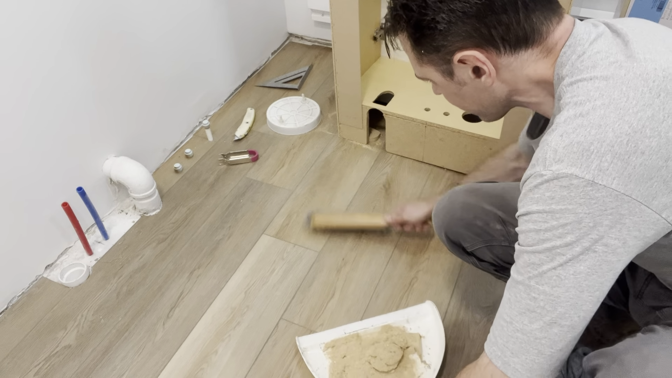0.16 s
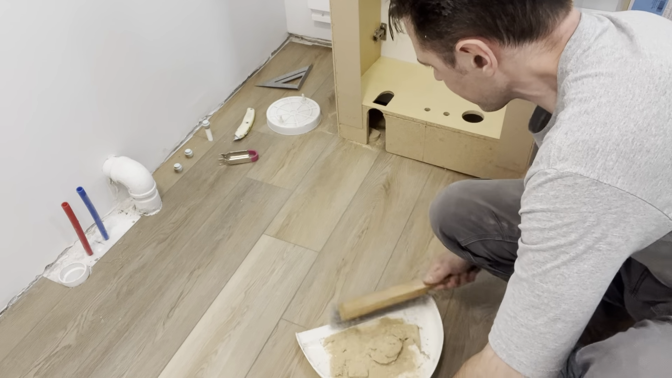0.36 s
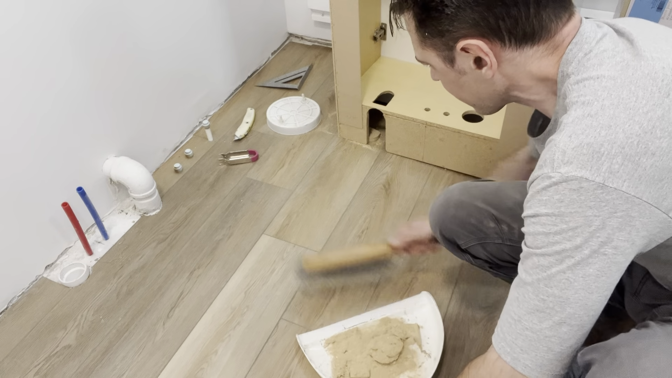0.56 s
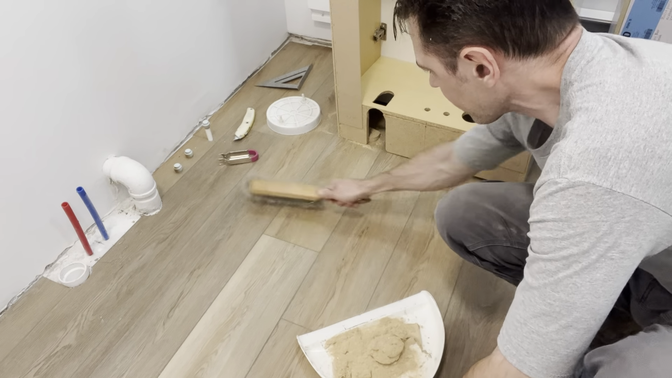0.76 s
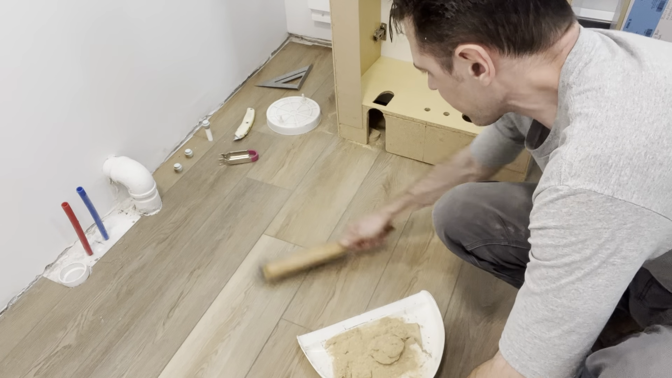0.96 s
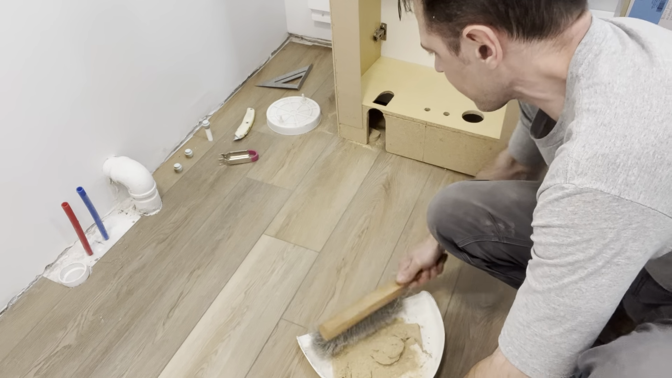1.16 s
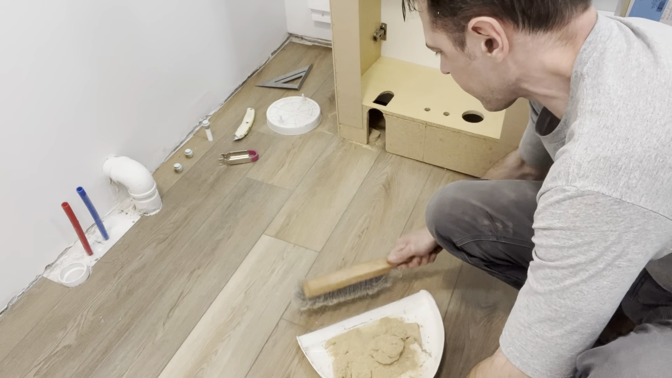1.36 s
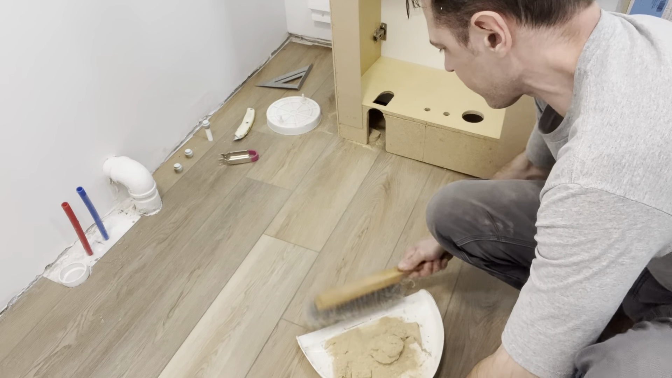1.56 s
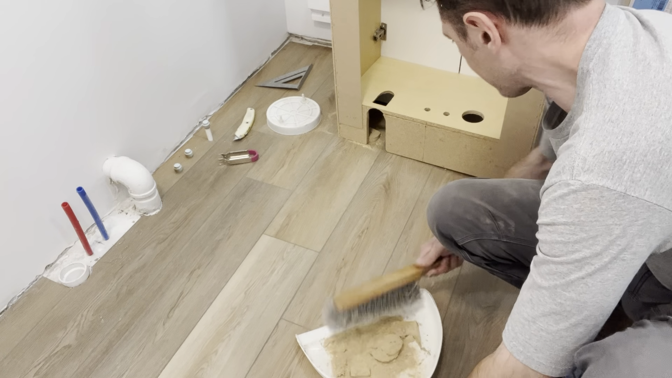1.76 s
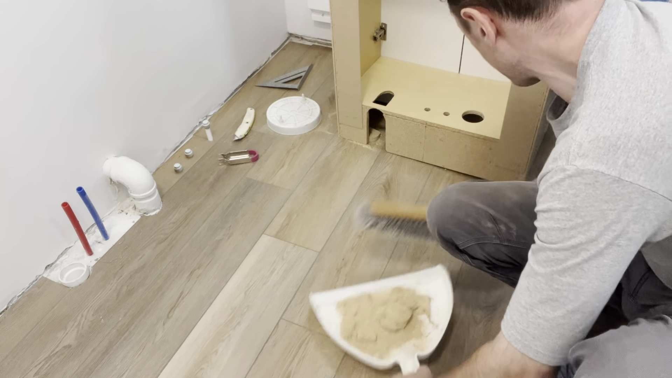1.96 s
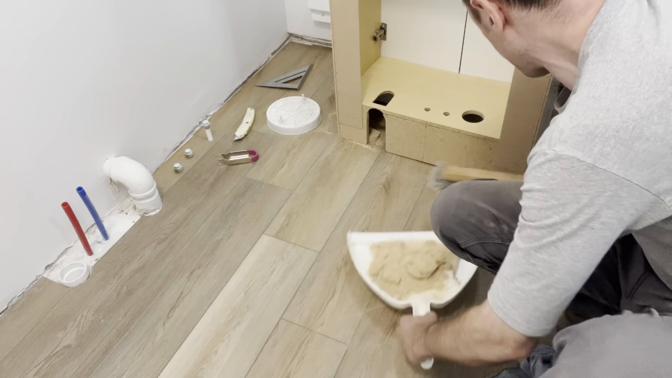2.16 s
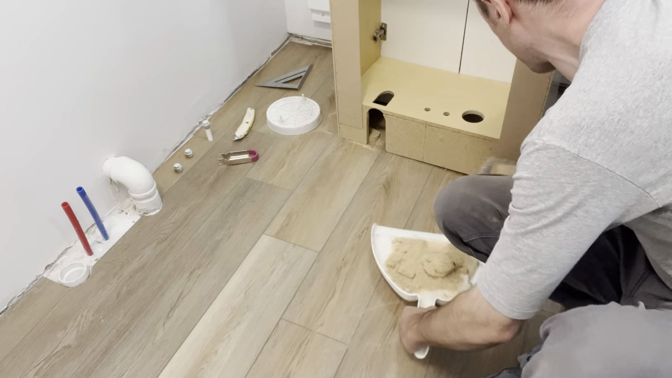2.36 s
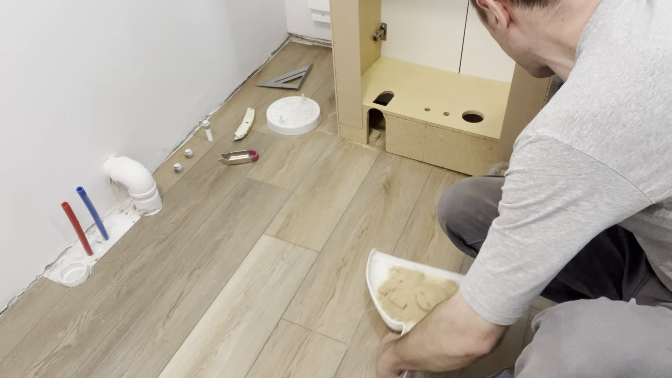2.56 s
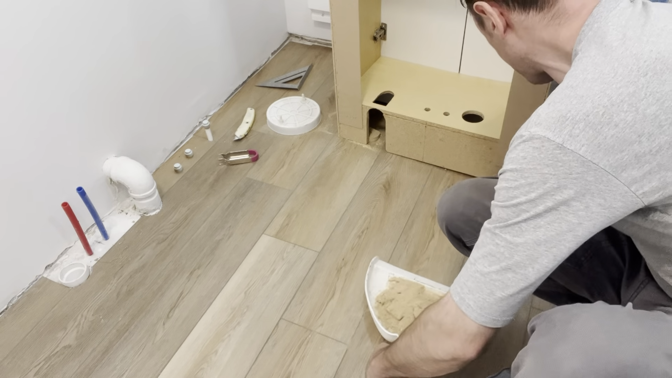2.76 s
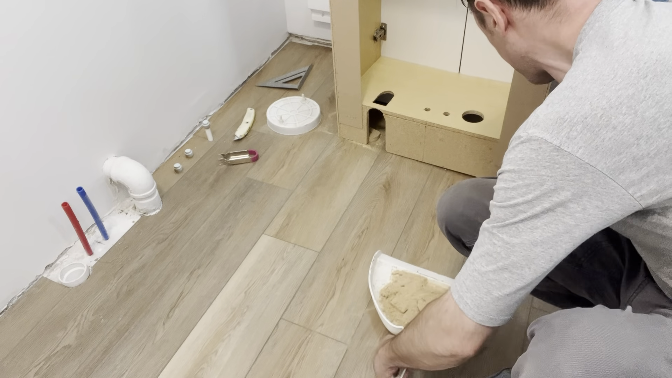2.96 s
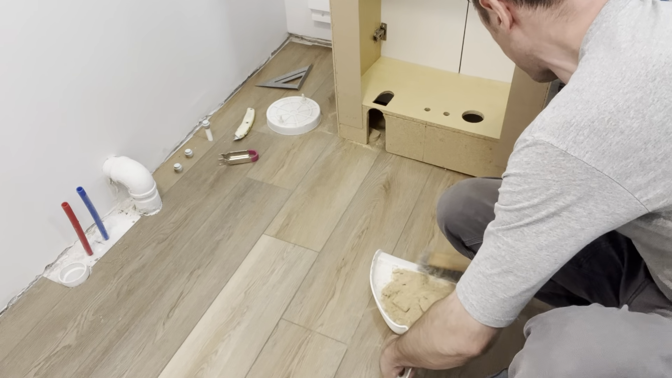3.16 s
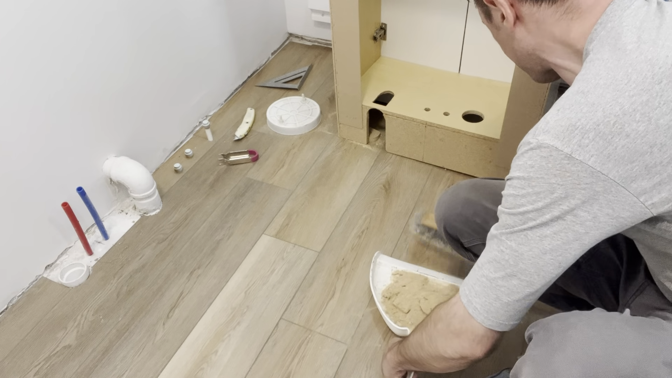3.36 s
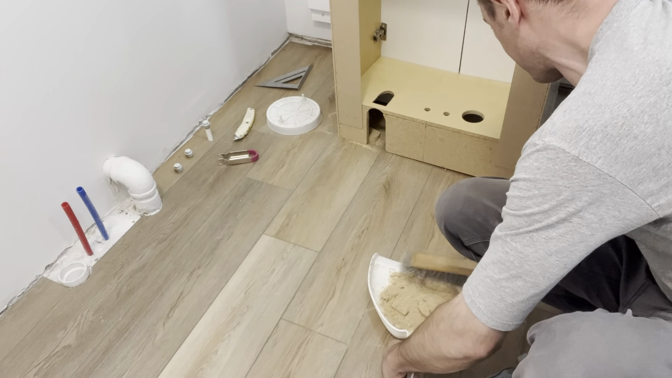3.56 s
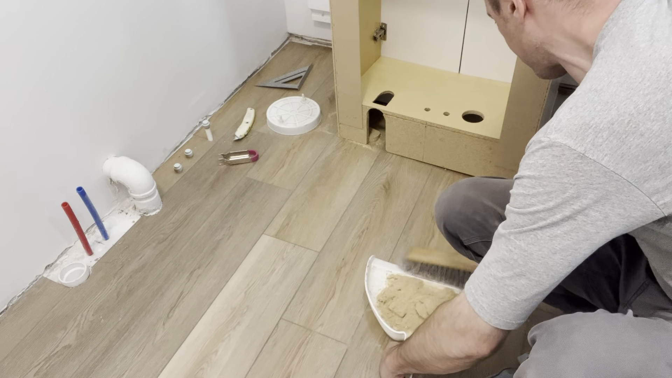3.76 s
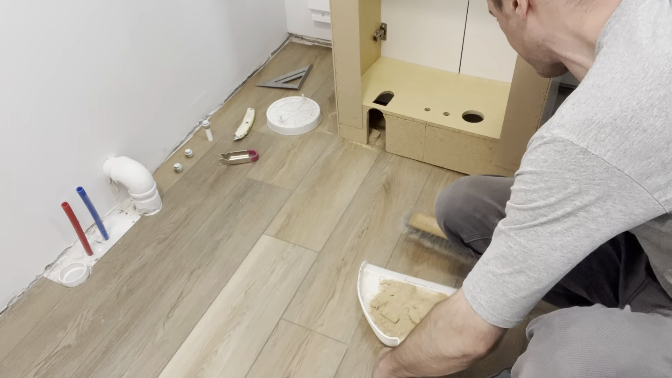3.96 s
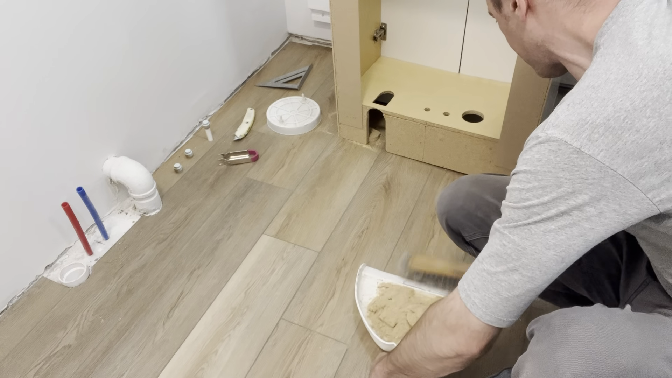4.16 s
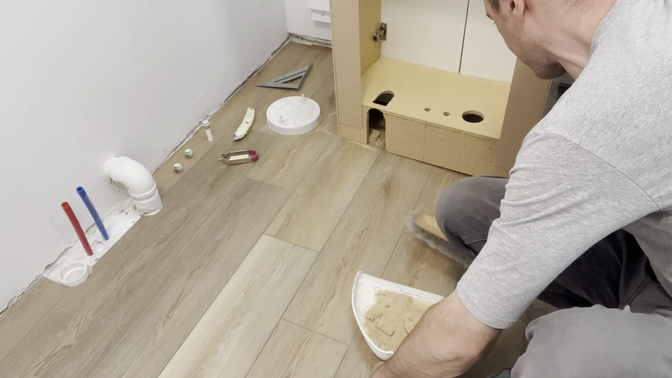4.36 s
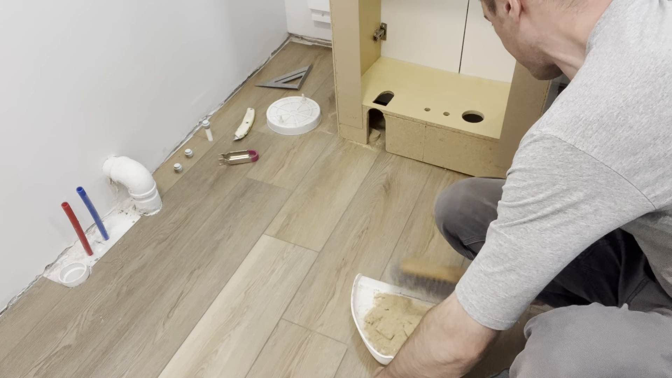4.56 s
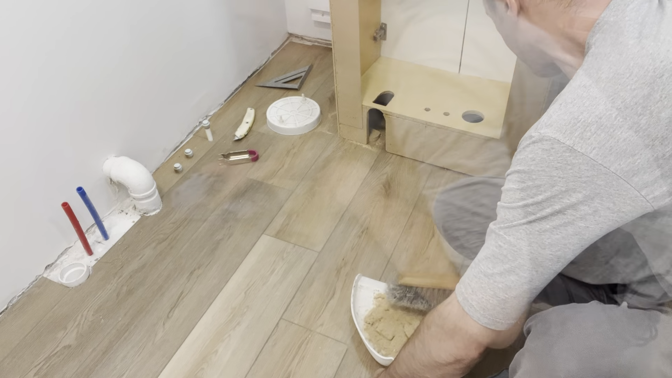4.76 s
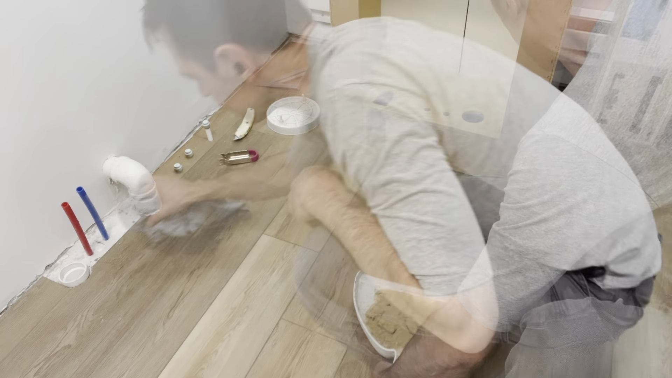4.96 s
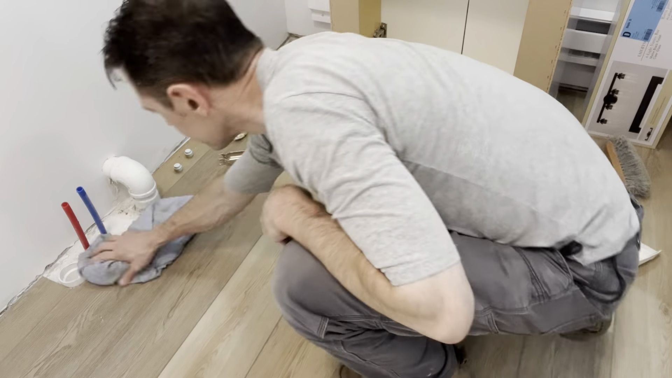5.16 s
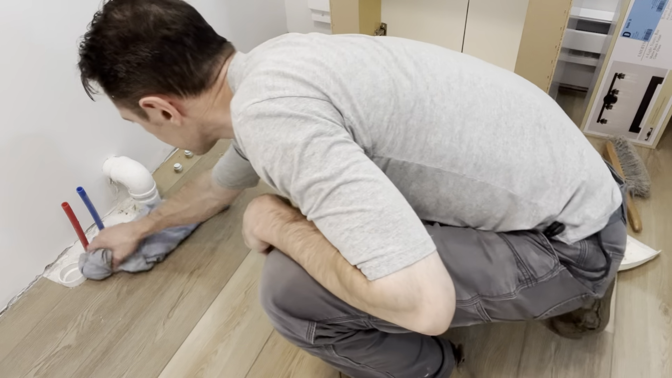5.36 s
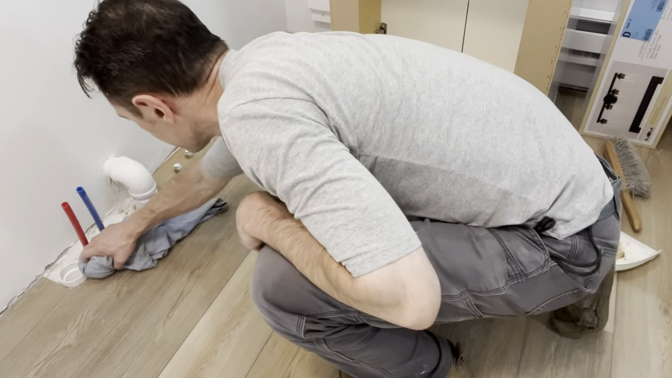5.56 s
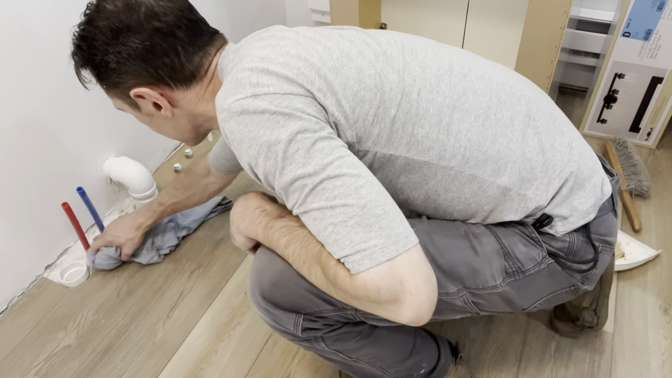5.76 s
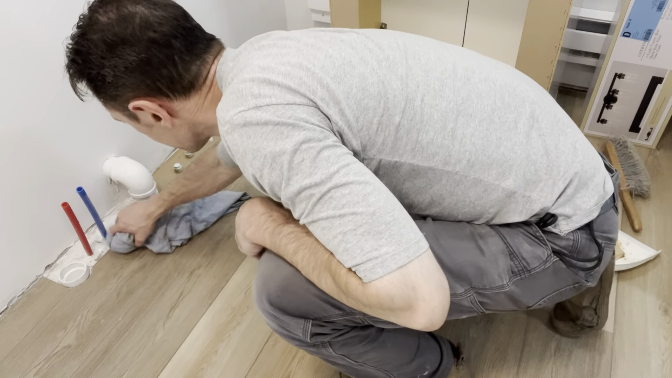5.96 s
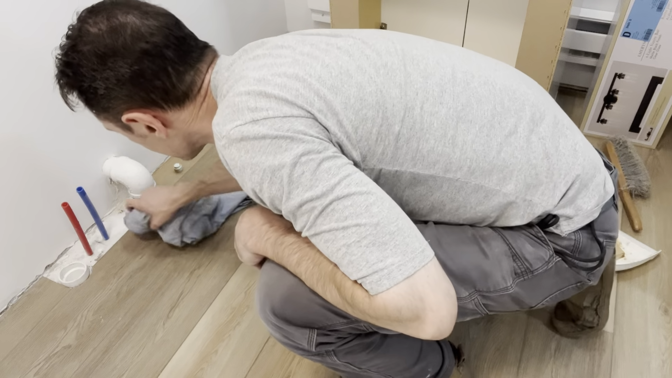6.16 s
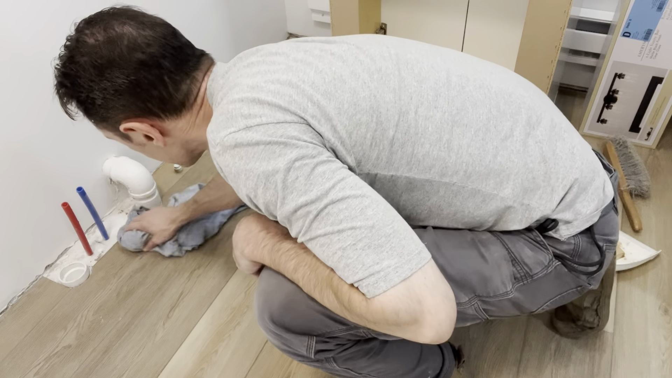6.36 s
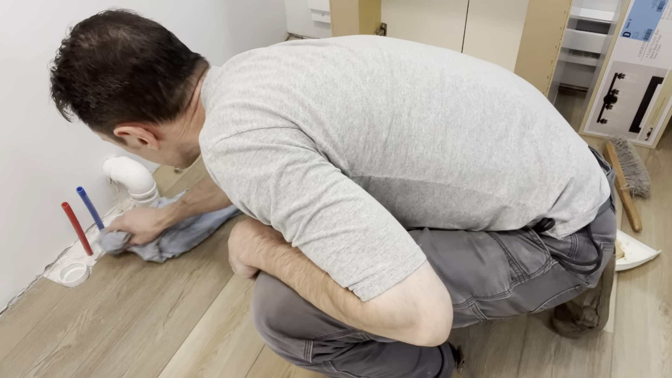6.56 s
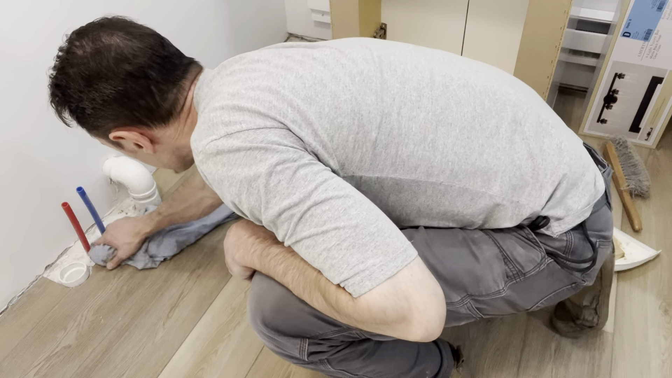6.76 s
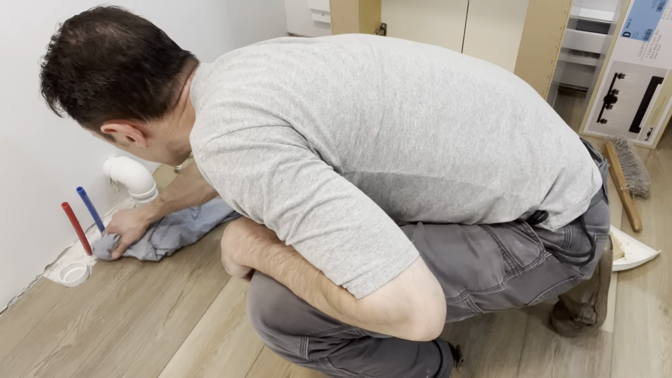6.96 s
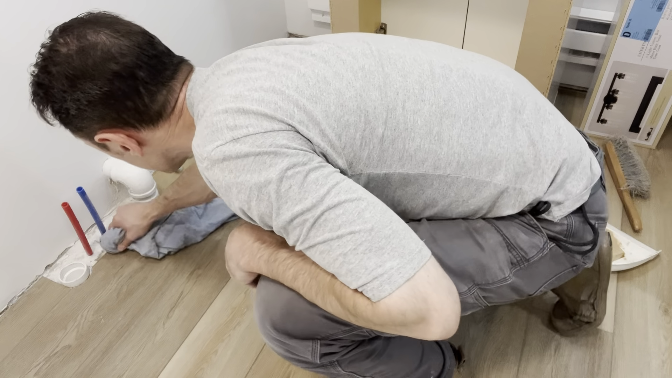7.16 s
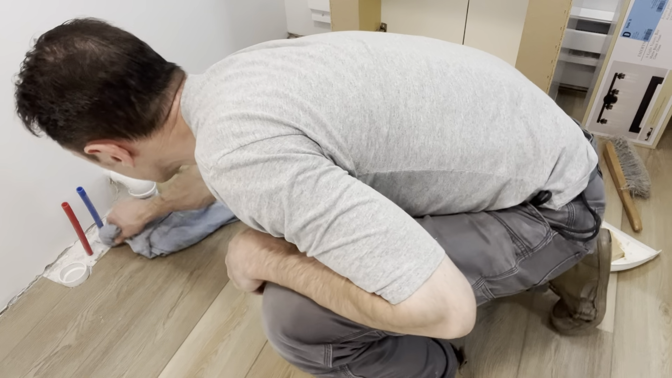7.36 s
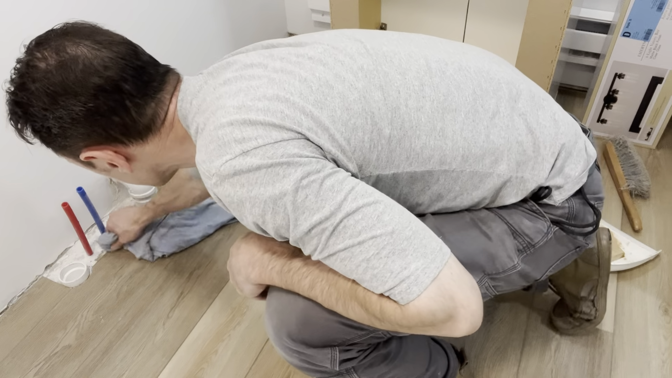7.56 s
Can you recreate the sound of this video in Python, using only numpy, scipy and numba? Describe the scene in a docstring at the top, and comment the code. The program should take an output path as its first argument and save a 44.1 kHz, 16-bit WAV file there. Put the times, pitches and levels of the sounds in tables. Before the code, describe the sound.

In a small bare room, a stiff hand brush sweeps sawdust over laminate in dry, swelling scrapes, then flicks and taps at a plastic dustpan. Knocks follow, the hardest just before four seconds with a low floor thump. Short brisk strokes continue until about five seconds, then a rag rubs faintly around a drain pipe with small hollow slips. Close stereo pickup, faint room tone, slightly more hiss on the left.

```python
"""A hand brush sweeps sawdust over a laminate floor into a plastic dustpan; floor thumps and harder knocks join in.
Then a rag wipes round a drain pipe, over the quiet of the house throughout.
Bristles and fibres are coloured random clicks; grit and blows ring the modes of pan and brush back.
Pushes on the floor and slips of the rag ring the modes of floor and pipe.
The room is small and bare; the left channel is hissier and the treble is nearly mono."""
import sys
import numpy as np
from scipy import signal
from scipy.fft import rfft, irfft, next_fast_len
from scipy.io import wavfile
from scipy.ndimage import uniform_filter1d
from numba import njit

SR = 44100
rng = np.random.default_rng(int(sys.argv[2]) if len(sys.argv) > 2 else 0)


def persist_wave(psi):
    """Save psi, clipped to +-1, as 16-bit WAV."""
    counts = np.round(np.clip(psi, -1, 1) * 32767).astype(np.int16)
    wavfile.write(sys.argv[1], SR, np.atleast_2d(counts).T)


N = 339570  # samples

# Event levels are ahead of the room; spectra are relative, as each layer is scaled to rms 1.
# Brush strokes: land_s, land_hiss_db, lift_s, lift_hiss_db, tips_db (above hiss, at FIRM_DB),
# rumble_db (above hiss), land_ring_db, lift_ring_db (above hiss), land_ring_hz, lift_ring_hz
STROKES = [(-0.02, -50.5, 0.36, -46, -5, -18.5, 0.5, 2, 1320, 1100),
           (0.79, -55, 1.01, -47, -1, -26, -10, -14, 1200, 1180),
           (1.02, -56, 1.13, -48, -2.5, -25, -18, -18, 1100, 1400),
           (1.31, -68, 1.34, -63, -9, -21, 1, 4, 1300, 1200),
           (1.412, -54, 1.457, -51, -3.5, -17, -7, -4.5, 1310, 1390),
           (1.62, -62, 1.655, -53.5, -2.5, -19, 6, -1, 1480, 1420),
           (1.745, -59, 1.763, -59.5, -5, -13.5, 0, 6, 1198, 1060),
           (2.637, -56, 2.93, -52, -3.5, -12.5, 9, 9.5, 985, 1140),
           (2.98, -52, 3.175, -48.5, -6, -30.5, 7, -5, 1190, 1160),
           (3.3, -67, 3.45, -60.5, -2, -22, 6, 0.5, 1250, 1300),
           (3.474, -54, 3.54, -50, -3.5, -20, -4.5, -4.5, 1270, 1330),
           (3.65, -69, 3.76, -54, -6, -28, 2, 5, 1201, 1260),
           (3.746, -43, 3.753, -45.5, -8, -8.5, 1, 5.5, 1350, 1300),
           (3.8, -54, 3.9, -51, -5.5, -18, 6.5, 3, 1260, 1120),
           (3.93, -53.5, 4.02, -52, -3.5, -30, 2.5, 3.5, 1250, 1360),
           (4.04, -62, 4.1, -56, 0, -32, 5, 2, 1300, 1230),
           (4.12, -56, 4.18, -50, -1, -33, -8, -6, 1300, 1460),
           (4.2, -51.5, 4.375, -49.5, -4, -27, -1, -1, 1320, 1140),
           (4.43, -51.5, 4.497, -47.5, -3.5, -13, -8, -6.5, 960, 1350),
           (4.679, -64, 4.715, -47.5, -4, -15, 3, 0, 1400, 1290),
           (4.86, -72, 4.905, -66.5, -4, -9, 10, 16, 1350, 1100),
           (4.92, -76, 5, -70, -1, -4, 9, 7, 1039, 900)]
# Rag wipes: land_s, land_hiss_db, lift_s, lift_hiss_db, drag_db (above hiss)
WIPES = [(5.09, -71, 5.17, -65.5, 1), (5.25, -79, 5.42, -69, -0.5), (5.55, -82, 5.64, -78.5, 4),
         (5.66, -74, 5.8, -54, -5.5), (5.8, -62, 5.91, -55.5, -3), (6.25, -70, 6.28, -67, 4),
         (6.38, -78, 6.5, -74, -2), (6.59, -74, 6.7, -64, -6), (6.86, -77.5, 7.08, -61.5, -4.5),
         (7.14, -68.5, 7.3, -65, -1.5), (7.33, -74, 7.44, -67, 2), (7.54, -69.5, 7.61, -60.5, -1)]
# Hard blows: start_s, level_db, struck_hz, crack_db, thud_db (both relative to level_db)
KNOCKS = [(1.41, -48.5, 1490, -6, -21), (1.628, -33.5, 1484, -4.5, -38), (1.641, -40.5, 1230, -7, -29),
          (1.667, -44, 1240, -3, -28), (1.699, -46.5, 1420, -2, -28), (2.64, -37, 850, -16, -22),
          (2.677, -30.5, 1145, -30, -35), (2.721, -43, 1080, -22, -26), (2.745, -42, 1150, -23, -25),
          (3.473, -45, 1400, -10, -20), (3.744, -20, 1300, -17, -27), (3.764, -35, 1300, -8, -19),
          (3.814, -34.5, 1670, -7, -23.5), (4.014, -35.5, 1340, -16, -43), (4.158, -39, 1790, -8.5, -28),
          (4.415, -34.5, 670, -18, -17), (4.431, -40, 670, -10, -18), (4.469, -37.5, 1220, -3, -24),
          (4.69, -32, 713, -11.5, -24), (4.691, -33.5, 1490, -14, -37), (4.705, -37, 690, -18, -29),
          (4.708, -40, 1570, -18, -35), (4.873, -46, 1040, -19, -26), (5.104, -49.5, 426, -24, -9),
          (5.604, -51.5, 331, -13, -9.5), (6.264, -58, 700, -17, -11), (7.414, -48, 1250, -12, -25),
          (7.418, -43, 480, -18, -10), (7.454, -46, 400, -22, -15)]
# Weight landing on the floor: time_s, drive_db (ahead of the floor response), slap_db (above drive_db)
THUMPS = [(0.02, -69.5, 13), (0.503, -71, -17.5), (0.809, -65, -14), (1.436, -65, -5), (1.642, -69, -4),
          (2.659, -66, -8), (3.487, -73, 1), (3.766, -42.5, -25), (4.159, -69, -8), (4.436, -51.5, -11),
          (4.711, -46.5, -8), (5.097, -65, 1), (5.169, -69.5, 11), (5.599, -65, 7), (6.031, -68, 0),
          (6.27, -66, -2), (6.478, -70, -3), (6.843, -68, -7), (7.099, -67, -4), (7.356, -69, -4),
          (7.419, -66, 8)]
# Hum of the pipe under the rag: time_s, level_db
PIPE_HUM = [(5.05, -80), (5.13, -66.5), (5.2, -74.5), (5.8, -74), (6.2, -75.5), (6.27, -65.5), (6.4, -76.5),
            (6.8, -71.5), (6.95, -63), (7.06, -60.5), (7.4, -60.5), (7.53, -64), (7.7, -61)]

# Floor resonances: mode_hz, gain_db, t60_s
FLOOR_MODES = [(57, -13, 0.35), (70, 3, 0.2)]
# Slapped floor boards: mode_hz, gain_db, t60_s
BOARD_MODES = [(138, -1, 0.16), (213, 1, 0.11)]
# Pan and brush back, ringing freely: mode_hz, gain_db, t60_s
BODY_MODES = [(363, -7.5, 0.052), (498, -7.5, 0.11), (579, -21, 0.22), (689, -5, 0.11), (800, -4.5, 0.11),
              (840, -4.5, 0.087), (945.5, -1, 0.051), (1080, -1, 0.044), (1206, 2, 0.033),
              (1292, -0.5, 0.054), (1380, 4, 0.025), (1585, 5, 0.028), (1751, -4.5, 0.059),
              (1964, -8, 0.088), (2515, -2.5, 0.069), (2720, -5.5, 0.057), (622.5, -15.5, 0.14),
              (2212, -2.5, 0.059), (2910, -29, 0.034), (3160, -1.5, 0.045), (3550, -6, 0.065)]
# Drain pipe: mode_hz, gain_db, t60_s
PIPE_MODES = [(303, 5.5, 0.03), (370, 0, 0.14), (453, 3.5, 0.055), (735, -13, 0.055), (1620, -10, 0.025),
              (2317, -4, 0.045), (2980, -13, 0.038), (4750, 5, 0.0088)]

# Bristle and cloth hiss: freq_hz, gain_db
BRISTLE_SPECTRUM = [(300, -28), (700, -5.5), (1400, -1), (2400, 2.5), (3200, 1), (4500, 1), (6000, -1),
                    (7500, -2.5), (9000, -13.5), (12000, -32)]
# Finest bristle tips and fibres: freq_hz, gain_db
TIP_SPECTRUM = [(6000, -22), (8300, -3.5), (10000, 1.5), (13000, -4.5), (16000, -1.5)]
# Floor rumble under the brush: freq_hz, gain_db
RUMBLE_SPECTRUM = [(60, -15), (140, -6), (230, 1), (350, -4.5), (550, 3), (900, -15.5)]
# Rag dragging on the boards: freq_hz, gain_db
DRAG_SPECTRUM = [(300, -2), (600, 1), (900, 1.5), (1500, -3), (2500, -28)]
# Dust shaken off by a blow: freq_hz, gain_db
CRACK_SPECTRUM = [(200, -37), (500, -10.5), (1500, 9.5), (2800, 5.5), (4500, -3), (8000, -10.5),
                  (15000, -15)]
# Dull body of a blow on the boards: freq_hz, gain_db
THUD_SPECTRUM = [(80, -23), (200, -1), (350, -8), (600, 1.5), (1000, -16), (3000, -45)]
# Quiet of the house: freq_hz, gain_db
HOUSE_SPECTRUM = [(25, -20), (55, -2), (150, -3.5), (400, -6), (800, -16), (2000, -12), (7000, -23.5),
                  (10000, -30.5), (16000, -41)]
# Left microphone self-noise: freq_hz, gain_db
HISS_SPECTRUM = [(300, 1), (1000, 4.5), (3000, 3), (7500, -2), (8300, -26)]
HOUSE_DB, HISS_DB = -71.5, -69

# Left-right likeness of echoes and house: freq_hz, likeness (0-1)
LIKENESS = [(60, 0.3), (150, 0.35), (400, 0), (1000, 0.01), (5000, 0)]
# Echo decay: freq_hz, t60_s
ROOM_T60 = [(100, 0.29), (1000, 0.28), (4000, 0.35), (14000, 0.089)]
# Left channel colour: freq_hz, gain_db
LEFT_COLOUR = [(40, 8.5), (120, -1), (2000, 1), (4500, -0.5), (6000, -2.3), (7400, 5.5), (8500, 3.5)]

ROOM_DB = -1  # echoes relative to direct sound
PLACES, DWELL_S = 6, .07
SHARED_HZ, TREBLE_LAG_SAMPLES, TOP_HZ = 7300, 8.1, 15720

FIRM_DB, TIPS_DB_PER_DB = -47.5, .5  # tips speak less than the rest under light pressure
LANDING_DB, LANDING_S = 11.5, 0.039  # extra rumble as the brush comes down
WANDER_DB, WANDER_SHARE, WANDER_HZ = 1, 0.062, 18.  # ring unevenness: level, centre, changes a second
FIBRES_DB = -7  # finest fibres relative to rag hiss
CONTACT_MS, CONTACT_MS_PER_DB, USUAL_DB = 3.37, 0.15, -37.5  # harder blows stay in contact longer
REACH_OCT, RING_SHARE = 0.16, .35  # width of struck region; ring length relative to the free ring
UPPER_HZ, UPPER_DB = 1860, -4.5
SWELL_POWER = 2.35  # pressure builds quickly, then levels off
FADE_DB_PER_S, RAG_FADE_DB_PER_S = 138.5, 106  # hiss after the lift
RING_FADE_DB_PER_S = 54  # ring dies this much faster than the hiss
SETTLE_DB, SETTLE_DB_PER_S = -16, 60  # fainter, slower tail as bristles and dust settle


def undb(db):
    """Gain of a level in dB."""
    return 10 ** (np.asarray(db) / 20)


def unit(x):
    """Scale to rms 1."""
    return x / np.sqrt(np.mean(x ** 2))


def on_log(table, hz):
    """Table value at each frequency, linear on a log-frequency axis."""
    points = np.array(table)
    return np.interp(np.log(np.maximum(hz, 1)), np.log(points[:, 0]), points[:, 1])


def colour(x, table):
    """Filter x by a (freq_hz, gain_db) table."""
    n = x.shape[-1]
    gain = undb(on_log(table, np.fft.rfftfreq(n, 1 / SR)))
    return irfft(rfft(x) * gain, n)


def mode(x, hz, t60_s):
    """One decaying resonance; a unit pulse rings with peak near 1."""
    radius = np.exp(-np.log(1000) / (t60_s * SR))
    angle = 2 * np.pi * hz / SR
    return signal.lfilter([0, radius * np.sin(angle)], [1, -2 * radius * np.cos(angle), radius ** 2], x)


def ring(x, modes):
    """All modes of one object, neighbours in opposite sign."""
    return sum((-1) ** k * undb(db) * mode(x, hz, t60_s) for k, (hz, db, t60_s) in enumerate(modes))


def smooth_noise(rate_hz):
    """Smooth random drift, rms 1."""
    k = int(SR / rate_hz)
    steps = np.repeat(rng.standard_normal(N // k + 1), k)
    return unit(uniform_filter1d(steps, k)[:N])


def grains(per_s, spread_db, patch_hz, patchy_db):
    """Random clicks of uneven size that come in slips and lulls."""
    on = rng.random(N) < per_s / SR
    size = undb(spread_db * np.minimum(rng.exponential(size=N), 4))
    sign = rng.choice([-1., 1.], N)
    return on * size * sign * undb(patchy_db * smooth_noise(patch_hz))


def contact(land_s, land_db, lift_s, lift_db, fade_db_per_s):
    """Level (dB) and progress (0-1) of a rubbing pass: sudden landing, swell, fade after the lift."""
    t = np.arange(N) / SR
    along = np.clip((t - land_s) / (lift_s - land_s), 0, 1)
    after_s = np.maximum(t - lift_s, 0)
    tail_db = np.maximum(-fade_db_per_s * after_s, SETTLE_DB - SETTLE_DB_PER_S * after_s)
    db = lift_db - (lift_db - land_db) * (1 - along) ** SWELL_POWER + tail_db
    return np.where(t >= land_s, db, -200), along


@njit
def moving_bandpass(x, hz, share):
    """State-variable band-pass whose centre moves; width is a share of the centre."""
    y, band, low = np.empty(len(x)), 0., 0.
    for i in range(len(x)):
        g = np.tan(np.pi * hz[i] / SR)
        v = (band + g * (x[i] - low)) / (1 + g * (g + share))
        band = 2 * v - band
        low = low + 2 * g * v
        y[i] = share * v
    return y


def brush(reach=0.33):
    """Bristles flick over the boards; coarser grit shakes the pan, the brush back and the floor."""
    t, power, spot = np.arange(N) / SR, 0, 0
    for land_s, land_db, lift_s, lift_db, tips_db, rumble_db, ring_db, end_ring_db, hz, end_hz in STROKES:
        hiss_db, along = contact(land_s, land_db, lift_s, lift_db, FADE_DB_PER_S)
        tip_above_db = tips_db + TIPS_DB_PER_DB * (hiss_db - FIRM_DB)
        ring_above_db = ring_db + (end_ring_db - ring_db) * along
        ring_above_db = ring_above_db - RING_FADE_DB_PER_S * np.maximum(t - lift_s, 0)
        rumble_above_db = rumble_db + LANDING_DB * np.exp(-np.abs(t - land_s) / LANDING_S)
        above_db = np.array([0 * hiss_db, tip_above_db, ring_above_db, rumble_above_db])
        layers = undb(2 * (hiss_db + above_db))  # power, so strokes add
        power = power + layers
        spot = spot + (hz + (end_hz - hz) * along) * layers[2]
    press, tips, body, rumble = uniform_filter1d(np.sqrt(power), size=180)
    flicks = grains(14000, 3.0, 40, 0.66)
    grit = grains(2500, 3.4, 35, 1.6)
    # the spot being scraped picks which modes sound
    centre_hz = spot / power[2] * (1 + WANDER_SHARE * smooth_noise(WANDER_HZ))
    shell = unit(moving_bandpass(ring(grit, BODY_MODES), centre_hz, reach))
    hiss = press * unit(colour(flicks, BRISTLE_SPECTRUM)) + tips * unit(colour(flicks, TIP_SPECTRUM))
    ringing = body * undb(WANDER_DB * smooth_noise(WANDER_HZ)) * shell
    return hiss + ringing + rumble * unit(colour(grit, RUMBLE_SPECTRUM))


def noise_pair(n):
    """Two noises whose likeness at each frequency follows LIKENESS."""
    c = np.clip(on_log(LIKENESS, np.fft.rfftfreq(n, 1 / SR)), 0, 1)
    mid, side = rfft(rng.standard_normal((2, n)))
    both = np.array([np.sqrt(1 + c) * mid + k * np.sqrt(1 - c) * side for k in (1, -1)])
    return irfft(both, n) / np.sqrt(2)


def house_quiet():
    """Steady coloured noise in two channels."""
    return unit(colour(noise_pair(N), HOUSE_SPECTRUM)) * undb(HOUSE_DB)


def push(start_s, ms):
    """Start sample and half-sine force of a contact, area 1."""
    force = np.sin(np.linspace(0, np.pi, max(int(ms * SR / 1000), 1) + 2))
    return int(start_s * SR), force / force.sum()


def thumps(contact_ms=5.6, swing_hz=69.4, swing_t60_s=0.091, spread=0.42):
    """A push slaps the boards and swings the floating floor, which fills the room's low modes a little later."""
    force = np.zeros((2, N + SR))
    for time_s, drive_db, slap_db in THUMPS:
        i, f = push(time_s - .012, contact_ms)
        force[:, i:i + len(f)] += undb([[drive_db], [drive_db + slap_db]]) * f
    swing = mode(force[0, :N], swing_hz, swing_t60_s) * undb(-46.5)
    sideways = np.array([[1], [-1]]) * mode(swing, 55.0, 0.24)  # opposite in left and right
    low = ring(swing, FLOOR_MODES) + spread * sideways
    return low + undb(5.5) * ring(force[1, :N], BOARD_MODES)


def blow(hz, ms, reach_oct, share, n):
    """A contact that chatters at hz rings the modes near it; peak 1."""
    force = push(0, ms)[1]
    chatter = force * np.cos(2 * np.pi * hz * np.arange(len(force)) / SR)
    chatter = np.pad(chatter, (0, n - len(force)))
    sound = 0
    for mode_hz, gain_db, t60_s in BODY_MODES:
        near_db = gain_db - 10.0 * (np.log2(mode_hz / hz) / reach_oct) ** 2
        sound = sound + undb(near_db) * mode(chatter, mode_hz, share * t60_s)
    return sound / np.abs(sound).max()


def knocks(crack_ms=17.0, upper_ms=0.7, upper_reach_oct=0.56, thud_ms=26.0):
    """Each blow rings a narrow struck region and a wider upper one, cracks off dust and thuds in the boards."""
    out, n = np.zeros(N + SR), SR // 8
    t_ms = 1000 * np.arange(n) / SR
    for start_s, db, hz, crack_db, thud_db in KNOCKS:
        dust = rng.standard_normal(n)
        i, ms = int(start_s * SR), CONTACT_MS + CONTACT_MS_PER_DB * (db - USUAL_DB)
        struck = blow(hz, ms, REACH_OCT, RING_SHARE, n)
        upper = undb(UPPER_DB) * blow(UPPER_HZ, upper_ms, upper_reach_oct, 2 * RING_SHARE, n)
        crack_shape = np.exp(-t_ms / crack_ms) * np.minimum(t_ms / ms, 1)
        crack = undb(crack_db) * unit(colour(dust, CRACK_SPECTRUM)) * crack_shape
        thud_shape = np.exp(-t_ms / thud_ms) * np.minimum(t_ms / 10, 1)
        thud = undb(thud_db) * unit(colour(dust, THUD_SPECTRUM)) * thud_shape
        out[i:i + n] += undb(db) * (struck + upper + crack + thud)
    return out[:N]


def rag():
    """Cloth fibres hiss softly, drag on the boards and set the hollow pipe humming in slips."""
    power = 0
    for land_s, land_db, lift_s, lift_db, drag_db in WIPES:
        hiss_db, _ = contact(land_s, land_db, lift_s, lift_db, RAG_FADE_DB_PER_S)
        power = power + undb(2 * (hiss_db + np.array([[0], [drag_db]])))
    press, drag = uniform_filter1d(np.sqrt(power), size=441)
    hum = undb(np.interp(np.arange(N) / SR, *np.array(PIPE_HUM).T, left=-200))
    fibres = grains(16000, 2.7, 30, 1.7)
    fine = undb(FIBRES_DB) * unit(colour(fibres, TIP_SPECTRUM))
    hiss = unit(colour(fibres, BRISTLE_SPECTRUM)) + fine
    boards = unit(colour(grains(3000, 3.0, 30, 0.78), DRAG_SPECTRUM))
    pipe = unit(ring(grains(2500, 2.2, 25, 2.0), PIPE_MODES))
    return press * hiss + drag * boards + hum * pipe


def echoes(lag_samples):
    """Direct sound (right delayed by the lag), then dense echoes decaying by octave band."""
    n = SR // 3
    t, noise, echo = np.arange(n) / SR, rfft(noise_pair(n)), 0
    hz = np.fft.rfftfreq(n, 1 / SR)
    for centre_hz in 62.5 * 2. ** np.arange(9):
        share = np.clip(1 - np.abs(np.log2(np.maximum(hz, 62.5) / centre_hz)), 0, 1)
        echo = echo + irfft(noise * share, n) * undb(-60 * t / on_log(ROOM_T60, centre_hz))
    echo = echo * np.clip(t / 0.0011, 0, 1)
    echo = echo * undb(ROOM_DB) / np.sqrt(np.mean(np.sum(echo ** 2, axis=1)))
    echo[[0, 1], [0, lag_samples]] = 1
    return echo / np.sqrt(1 + undb(2 * ROOM_DB))


def room(x):
    """The hands keep moving, so sound crossfades round a cycle of places, each with its own echoes."""
    place = np.arange(N) / SR / DWELL_S % PLACES
    out, n = 0, next_fast_len(N + SR)
    for k, lag_samples in enumerate(rng.integers(0, 16, PLACES)):
        away = np.abs((place - k + PLACES / 2) % PLACES - PLACES / 2)
        here = np.cos(np.pi / 2 * np.clip(away, 0, 1))
        out = out + rfft(x * here, n) * rfft(echoes(lag_samples), n)
    return irfft(out, n)[:, :N]


def scene():
    """Brush, knocks and rag in the room, plus floor thumps and the quiet of the house."""
    return room(brush() + knocks() + rag()) + thumps() + house_quiet()


def record(dry):
    """The left channel is hissier; treble is nearly mono, the right a few samples late."""
    hiss = undb(HISS_DB) * unit(colour(rng.standard_normal(N), HISS_SPECTRUM))
    left = colour(dry[0], LEFT_COLOUR) + hiss
    hz = np.fft.rfftfreq(N, 1 / SR)
    shared = 1 / (1 + (SHARED_HZ / np.maximum(hz, 1)) ** 8)
    # the last point alone is a flat gain
    late = rfft(colour(dry[0], LEFT_COLOUR[-1:])) * np.exp(-2j * np.pi * hz * TREBLE_LAG_SAMPLES / SR)
    right = irfft(np.sqrt(shared) * late + np.sqrt(1 - shared) * rfft(dry[1]), N)
    low_cut = signal.butter(2, 45, "high", fs=SR, output="sos")
    top_cut = signal.ellip(10, .2, 80, TOP_HZ, fs=SR, output="sos")
    return signal.sosfilt(top_cut, signal.sosfilt(low_cut, np.array([left, right])))


dry = scene()
out = record(dry)
persist_wave(out)
```